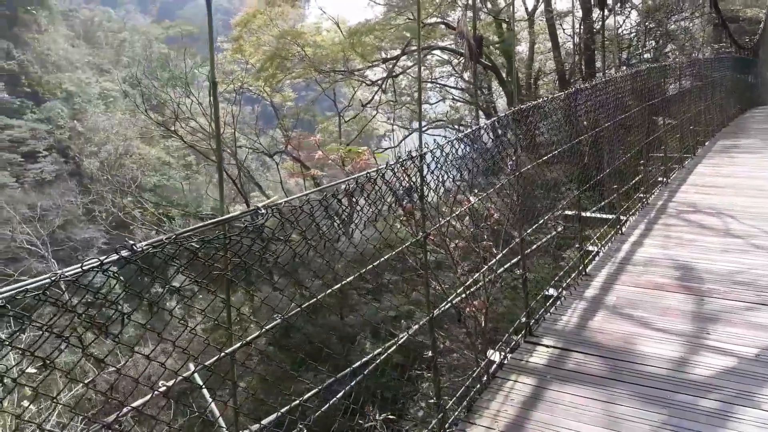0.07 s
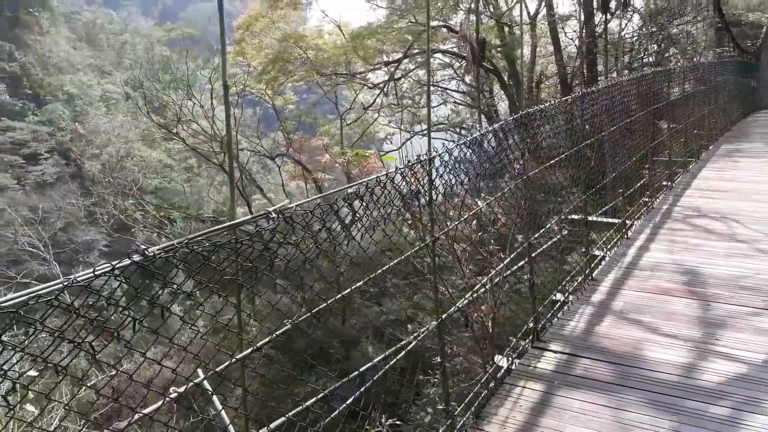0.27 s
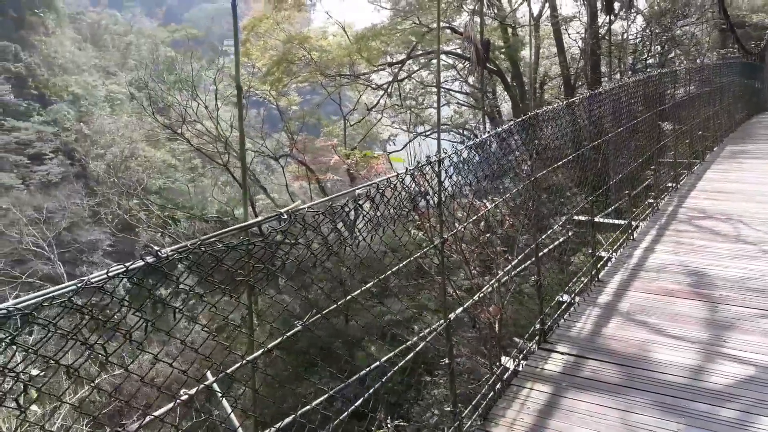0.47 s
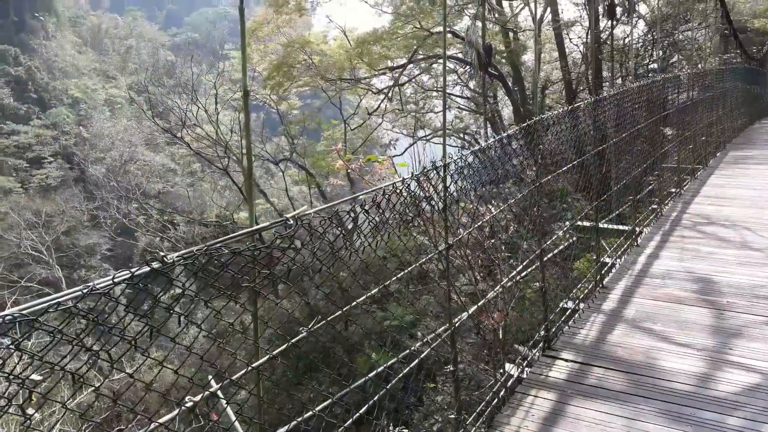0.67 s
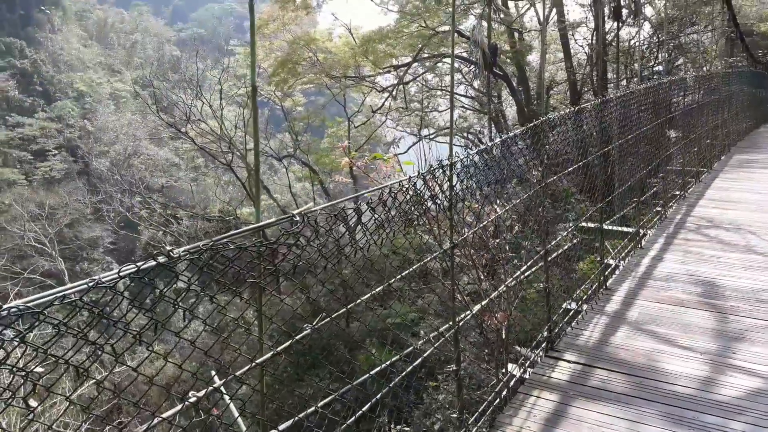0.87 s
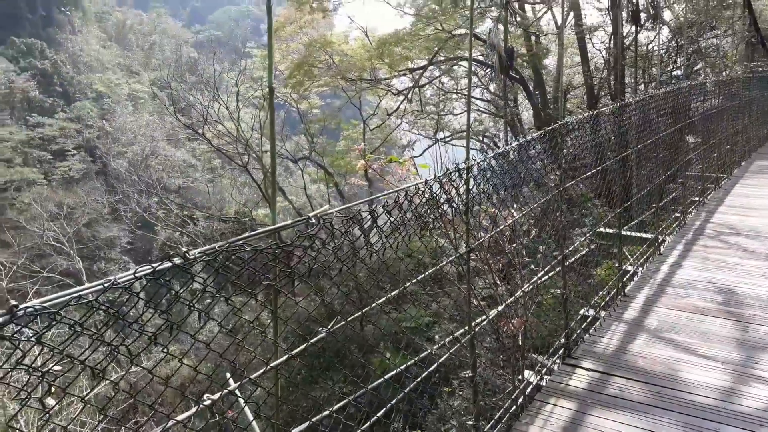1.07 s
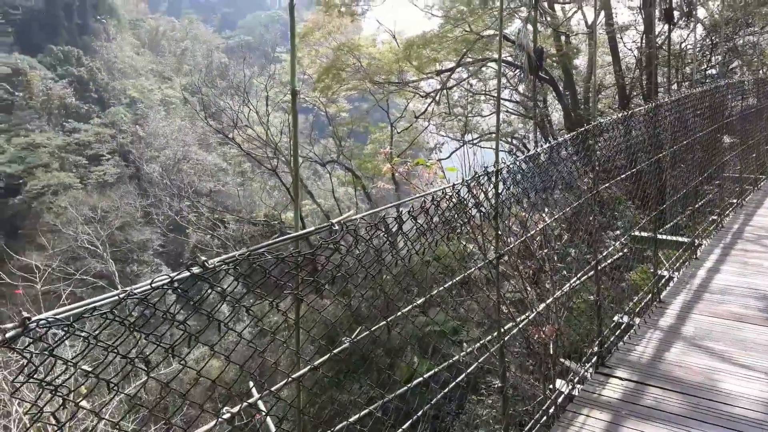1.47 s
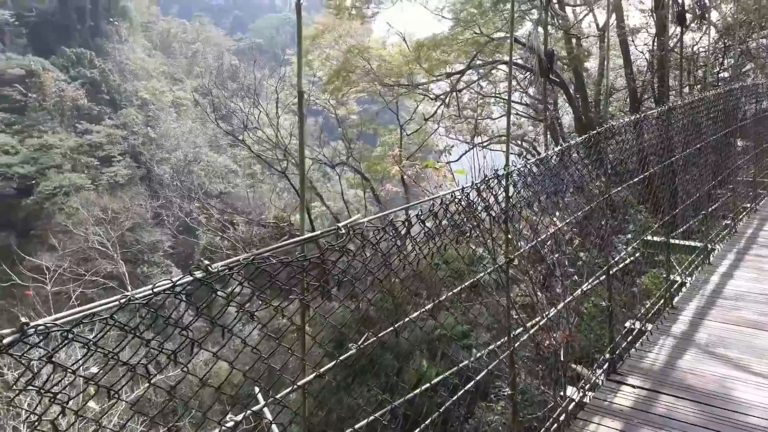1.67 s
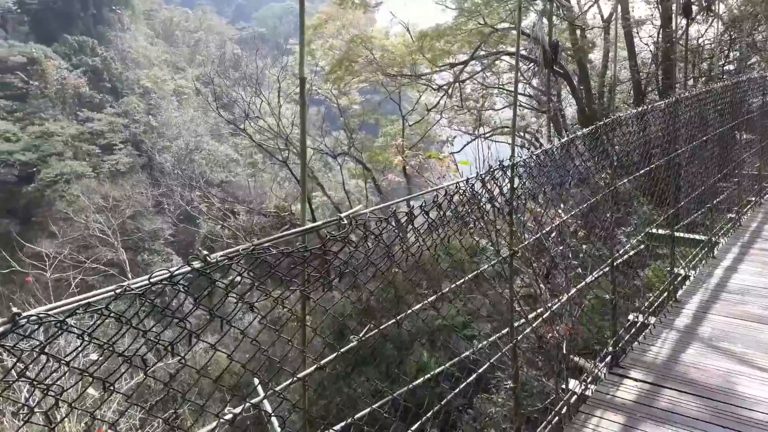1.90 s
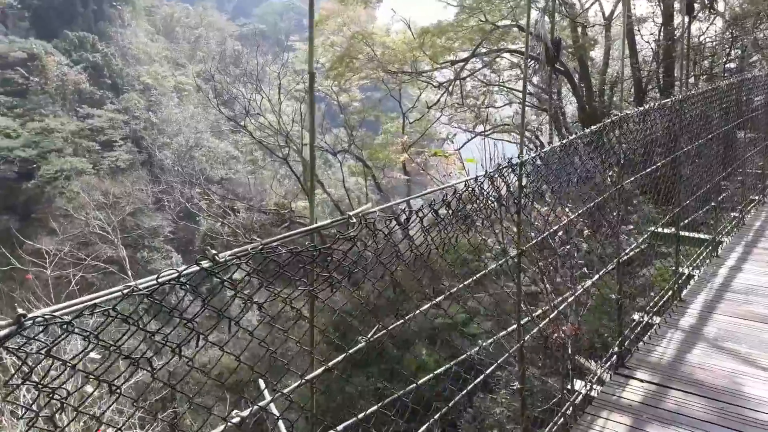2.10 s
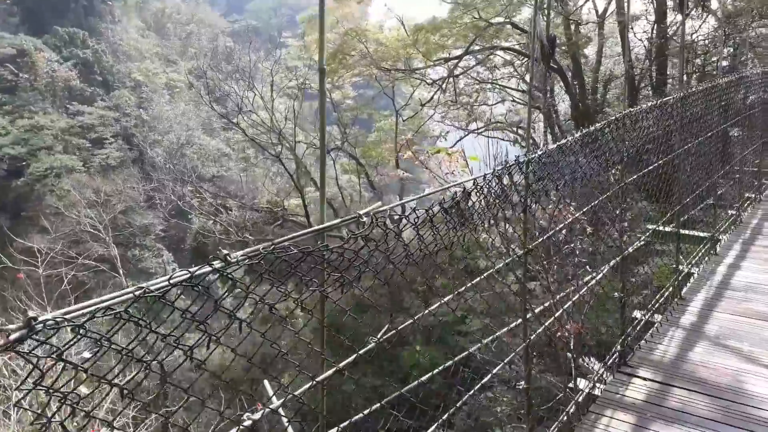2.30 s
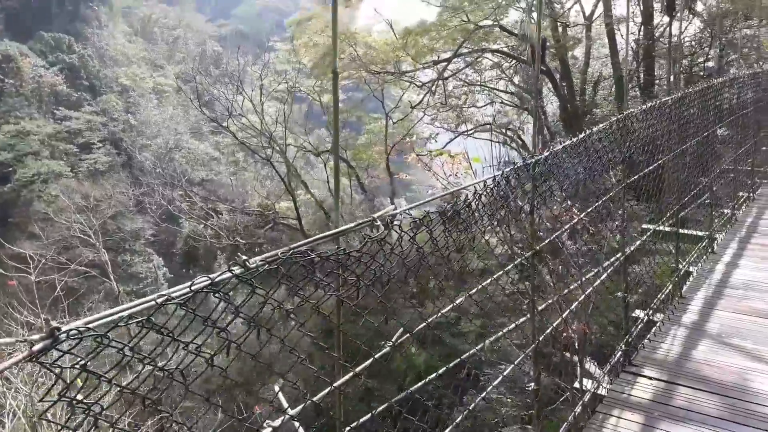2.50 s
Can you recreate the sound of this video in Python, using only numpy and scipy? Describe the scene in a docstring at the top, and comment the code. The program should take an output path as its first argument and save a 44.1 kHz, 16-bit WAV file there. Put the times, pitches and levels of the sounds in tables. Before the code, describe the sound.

A hydraulic rock breaker pounds in one rapid burst, each blow clacking on rock and ringing the steel. It stops, and the wooded gorge echoes on, with a few dull knocks over a steady airy rush.

```python
"""A wooded gorge, where a heavy hammer, probably a hydraulic rock breaker, pounds eight times a second.
Each blow clacks on rock, rings the steel and scatters through the trees; later ones hit harder
and carry less bass. The gorge rings on after the hammer stops, with a few dull knocks and tiny ticks.
Underneath lies a bed of steady, airy rush, low rumble and faint engine hum."""
import sys
import numpy as np
from scipy import signal
from scipy.fft import rfft, irfft, next_fast_len
from scipy.io import wavfile
from scipy.ndimage import uniform_filter1d, map_coordinates

SR = 44100
rng = np.random.default_rng(int(sys.argv[2]) if len(sys.argv) > 2 else 0)


def inscribe(sig):
    """Save sig as 16-bit PCM at rate SR to the path in sys.argv[1].

    A 1-D sig is mono; a 2-D sig holds one channel per row.
    Samples are clipped to [-1, 1] before scaling.
    """
    pcm = np.round(np.clip(np.atleast_2d(sig).T, -1, 1) * 32767)
    wavfile.write(sys.argv[1], SR, pcm.astype(np.int16))


N = 116865

# hammer hits and their trims
# (time [s], level [dB], bass [dB], treble [dB], boom [dB], grit [dB], ring and scatter [dB], clang [dB])
HAMMER_BLOWS = [(0.2392, -2, 1, -1, 3, 0, 2.5, 0.5), (0.3716, -2, 3.5, -1.5, -1, 0.5, 2.5, 5),
                (0.4995, -2.5, 3.5, 0.5, 4, 0, 1.5, 3), (0.626, -1, 4, 0.5, 2, 2, -0.5, 0.5),
                (0.7522, 0, 0, -2.5, 1, 1.5, 0.5, 2.5), (0.8741, -0.5, 4, 0.5, 1.5, 2, -1.5, 4.5),
                (0.9935, 0, 1.5, 2, -1.5, 1, -2, 0), (1.1120, 1.5, -1.5, 1, 1, -0.5, -2.5, -1.5),
                (1.229, 2.5, -2.5, 0, -4, 0.5, -2, -1), (1.349, 3, -1.5, 2, -9, 3.5, -0.5, -2),
                (1.475, 4.5, -3.5, -1.5, -25, 4, 0.5, 1.5), (1.5952, 5.5, -4.5, -1, -12, 4.5, -2, -1),
                (1.733, 1, -5.5, 3, -20, 0, -4.5, -13)]
# tone of steel on rock (frequency [Hz], relative density [dB])
STRIKE_SPECTRUM = [(60, -29), (100, -16.5), (135, -18.5), (175, -8.5), (280, -8.5), (380, -1.5), (520, -7),
                   (690, -1.5), (750, -8.5), (860, -5.5), (1040, -2.5), (1110, -1.5), (1220, -1.5),
                   (1290, -0.5), (1360, -10), (1440, 0), (1550, -23), (1700, -3), (2320, -4.5),
                   (2550, -8.5), (3200, -8.5), (4100, -29), (6200, -35), (7300, -43), (8400, -50),
                   (15000, -54)]
# decay of that clack (frequency [Hz], t60 [s])
STRIKE_DECAY = [(150, 0.23), (600, 0.11), (1300, 0.15), (2500, 0.11), (7000, 0.049)]
# tone of the reflections off trees and slopes (frequency [Hz], relative density [dB])
SCATTER_SPECTRUM = [(60, -37.5), (130, -14), (220, -11), (430, -1.5), (660, 0), (770, -5.5), (1220, 2.5),
                    (1560, -3.5), (1700, 1), (2300, 1), (3100, -4.5), (4500, -18.5), (6300, -26.5),
                    (7300, -19.5), (8400, -44.5), (15000, -50)]
# hollow modes of the struck mass (frequency [Hz], relative level [dB], t60 [s])
HOLLOW_MODES = [(560, -2, 0.056), (646.6, -2, 0.091), (869.4, -15.5, 0.096), (1030, -10, 0.088),
                (1198, -6.5, .18), (1287, -6, 0.097), (2277, -11.5, 0.12), (2400, -14.5, 0.21)]
# ringing modes of the tool (frequency [Hz], relative level [dB])
STEEL_MODES = [(242.2, -51), (506.0, -37), (866.7, -42), (1055, -46), (1281, -41), (1443, -39), (1672, -54),
               (2143, -37), (2272, -38)]
# thin high modes of the chisel (frequency [Hz], relative level [dB])
CHISEL_MODES = [(5351, -51), (6148, -51), (6541, -52), (8942, -58.5), (11480, -61)]
# fizz of crushed rock (frequency [Hz], relative density [dB])
GRIT_SPECTRUM = [(1500, -9), (4000, -3), (6500, 3), (7600, -1), (8300, -10), (11500, -13.5), (15500, -40)]
# dull knocks after the hammering (time [s], relative level [dB], bass [dB])
DULL_KNOCKS = [(1.963, -6.5, -1.5), (1.997, -10.5, -6), (2.053, -11, 7), (2.115, -11.5, 6),
               (2.147, -10, 1.5), (2.179, -6, 0), (2.356, -10, 5)]
# tiny high ticks (time [s], level [dB])
METAL_TICKS = [(1.929, -51), (1.963, -49), (2.458, -53)]
# tone of the gorge's reverb (frequency [Hz], relative density [dB])
GORGE_SPECTRUM = [(60, -23.5), (130, -22), (240, -1.5), (300, -6.5), (530, -2), (760, -3), (1200, 1.5),
                  (1560, 2.5), (2300, 4.5), (3100, -2.5), (4500, -18.5), (7300, -33), (8400, -51),
                  (15000, -70)]
# decay of its near tail (frequency [Hz], t60 [s])
GORGE_DECAY = [(200, 5.9), (1500, 1.7), (3000, 3.1), (8000, 3.2)]
# tone of the steady rush (frequency [Hz], relative density [dB])
RUSH_SPECTRUM = [(20, -45), (45, -28), (100, -5), (230, 0.5), (650, -0.5), (1200, -2), (1600, -1.5),
                 (2300, 4), (3200, -6.5), (4200, -12), (6200, -24), (7400, -15.5), (8300, -36.5),
                 (11500, -28.5), (15500, -32)]
# tone of the low rumble (frequency [Hz], relative density [dB])
RUMBLE_SPECTRUM = [(20, -50), (35, -26), (48, 3), (75, 1), (105, 4), (135, -11), (250, -59)]
# fader curve of the rumble (time [s], level [dB])
RUMBLE_FADER = [(0, -69), (.5, -59), (1.5, -54.5), (1.619, -52.5), (1.75, -56), (2.279, -58.5), (2.43, -50),
                (2.65, -57.5)]
# partials of the engine hum (frequency [Hz], level [dB])
HUM_PARTIALS = [(98, -65), (170, -61.5), (243, -55)]

STRIKE_DB, SCATTER_DB, HOLLOW_DB, STEEL_DB = -22, -19, -16, -25.5
CRACK_DB, RASP_DB, GRIT_DB, GORGE_DB, RUSH_DB = -40, -46.5, -49, -12.5, -42.5
STRIKE_ATTACK_S, RING_ATTACK_S, KNOCK_ATTACK_S, KNOCK_T60_S = 0.0011, 0.0072, 0.0038, 0.19
RING_SPREAD_DB, PHASE_SPREAD_RAD = 2, 0.86  # variation from hit to hit
BASS_HZ, TREBLE_HZ = 780, 1940


def hammer(repeat_share=0.54, sink_db_per_s=19):
    """Hits on one spot, so part of the clatter repeats. As the chisel sinks, its shimmer turns to rasp."""
    track, t = np.zeros(N), np.arange(SR // 2) / SR
    clatter = lambda: np.array([amp(STRIKE_DB) * strike(t), amp(SCATTER_DB) * scatter(t)])
    repeated = clatter()
    phases = rng.uniform(0, 2 * np.pi, len(STEEL_MODES))
    for s, db, bass_db, treble_db, boom_db, grit_db, ring_db, clang_db in HAMMER_BLOWS:
        direct, scattered = np.sqrt(repeat_share) * repeated + np.sqrt(1 - repeat_share) * clatter()
        exposed = amp(-sink_db_per_s * (s - HAMMER_BLOWS[0][0]))
        ring = scattered + amp(STEEL_DB) * steel(t, phases) + exposed * chisel(t)
        blow = direct + amp(CRACK_DB) * crack(t) + amp(ring_db) * ring
        body = amp(HOLLOW_DB) * hollow(t, phases, boom_db, clang_db)
        scrape = amp(RASP_DB) * (1 - exposed) * rasp(t)
        fizz = amp(GRIT_DB + grit_db) * grit(t)
        add(track, s, amp(db) * (shelves(blow, bass_db, treble_db) + body + fizz + scrape))
    return track


def strike(t, bounce_s=0.007, bounce_db=-3.5):
    """Steel on rock: a dense, tight clack with its bounce off the rough ground close behind."""
    clack = lambda: dying(rng.standard_normal(len(t)), STRIKE_DECAY)
    hit = clack()
    add(hit, bounce_s, amp(bounce_db) * clack())
    hit = even(hit, size=40) * (1 - np.exp(-t / STRIKE_ATTACK_S))
    eq_db = lambda hz: along(STRIKE_SPECTRUM, hz)
    eq_rms = np.sqrt(np.mean(amp(eq_db(np.fft.rfftfreq(len(t), 1 / SR))) ** 2))
    return coloured(hit, eq_db) / eq_rms


def scatter(t):
    """Early reflections: the blow thrown back by nearby trees and slopes."""
    return noise(SCATTER_SPECTRUM, len(t)) * envelope(t, attack_s=0.037, t60=0.43)


def hollow(t, phases, boom_db, clang_db, pitch_spread=0.015):
    """The body of the hit: low modes of the struck mass boom, higher ones clang, each slightly detuned."""
    hz, db, t60 = np.transpose(HOLLOW_MODES)[:, :, None]
    detune, shift = rng.standard_normal((2, len(hz), 1))
    start = phases[:len(hz), None] + PHASE_SPREAD_RAD * shift
    waves = np.sin(2 * np.pi * hz * (1 + pitch_spread * detune) * t + start)
    gains = amp(db + np.where(hz < BASS_HZ, boom_db, clang_db))
    return np.sum(gains * waves * envelope(t, attack_s=0.0069, t60=t60), axis=0)


def steel(t, phases, pitch_spread=0.0029):
    """The tool rings in its modes, a little different in strength and pitch on every hit."""
    hz, db = np.transpose(STEEL_MODES)
    louder, detune, shift = rng.standard_normal((3, len(hz)))
    gains = amp(db + RING_SPREAD_DB * louder) / np.linalg.norm(amp(db)) * np.sqrt(2)
    start = phases + PHASE_SPREAD_RAD * shift
    waves = np.sin(2 * np.pi * np.outer(hz * (1 + pitch_spread * detune), t) + start[:, None])
    return gains @ waves * envelope(t, RING_ATTACK_S, t60=0.26)


def chisel(t, linewidth_hz=24):
    """The chisel's thin ring above the clatter; drifting phases make it shimmer."""
    hz, db = np.transpose(CHISEL_MODES)[:, :, None]
    drift = np.cumsum(rng.standard_normal((len(hz), len(t))), axis=1)
    drift *= np.sqrt(2 * np.pi * linewidth_hz / SR)
    gains = amp(db + RING_SPREAD_DB * rng.standard_normal(db.shape))
    ring = np.sum(gains * np.sin(2 * np.pi * hz * t + drift), axis=0)
    return ring * envelope(t, RING_ATTACK_S, t60=0.44)


def crack(t, delay_s=0.0024):
    """A short, high clink of metal on metal."""
    shape = envelope(np.maximum(t - delay_s, 0), STRIKE_ATTACK_S, t60=0.048)
    return band(len(t), centre_hz=7290, width_hz=200) * shape


def rasp(t, delay_s=0.036):
    """A rasp just behind the hit, perhaps the chisel scraping in its hole."""
    shape = envelope(np.maximum(t - delay_s, 0), KNOCK_ATTACK_S, KNOCK_T60_S)
    return band(len(t), centre_hz=3970, width_hz=750) * shape


def grit(t):
    """Crushed rock: a bright burst of fizz."""
    return noise(GRIT_SPECTRUM, len(t)) * envelope(t, STRIKE_ATTACK_S, t60=0.48)


def knocks():
    """Soft, dull knocks, perhaps broken rock settling."""
    track, t = np.zeros(N), np.arange(SR // 2) / SR
    for s, db, bass_db in DULL_KNOCKS:
        knock = noise(STRIKE_SPECTRUM, len(t)) * envelope(t, KNOCK_ATTACK_S, KNOCK_T60_S)
        add(track, s, amp(STRIKE_DB + db) * shelves(knock, bass_db, treble_db=0))
    return track


def gorge(x, far_delay_s=0.533, far_db=0.5):
    """The valley's long reverb tail, with a late, smeared echo off its far side."""
    t = np.arange(N) / SR
    near = dying(rng.standard_normal(N), GORGE_DECAY) * (1 - np.exp(-t / 0.077))  # soft bloom
    far = rng.standard_normal(N) * envelope(np.maximum(t - far_delay_s, 0), attack_s=0.061, t60=2.25)
    wet = signal.fftconvolve(x, near + amp(far_db) * far)[:N]
    # tilt the clatter's tone towards that of the gorge
    wet = coloured(wet, lambda hz: along(GORGE_SPECTRUM, hz) - along(SCATTER_SPECTRUM, hz))
    return unit(wet) * np.std(x)


def ticks():
    """A few tiny metallic ticks in the tail."""
    track, t = np.zeros(N), np.arange(SR // 10) / SR
    for s, db in METAL_TICKS:
        add(track, s, amp(db) * crack(t))
    return track


def engine(waver_hz=9.12):
    """A faint, wavering hum, probably the engine that drives the hammer."""
    turn = 2 * np.pi * np.arange(N) / SR
    return sum(amp(db) * (wobble(waver_hz) * np.sin(hz * turn) + wobble(waver_hz) * np.cos(hz * turn))
               for hz, db in HUM_PARTIALS)


def background_rush():
    """The bed: a steady, airy rush hanging in the gorge, over a low rumble that swells and ebbs."""
    fader_db = np.interp(np.arange(N) / SR, *np.transpose(RUMBLE_FADER))
    rumble = amp(fader_db) * noise(RUMBLE_SPECTRUM, N)
    return amp(RUSH_DB) * noise(RUSH_SPECTRUM, N) + rumble


def amp(db):
    """Decibels to gain."""
    return 10 ** (np.asarray(db) / 20)


def unit(x):
    """x at rms 1."""
    return x / np.sqrt(np.mean(x ** 2) + 1e-20)


def along(points, hz):
    """(Hz, value) points read on a log axis."""
    f, v = np.transpose(points)
    return np.interp(np.log(hz + 1), np.log(f + 1), v)


def add(track, s, sound):
    """Mix a sound into the track at s seconds."""
    part = track[int(s * SR):][:len(sound)]
    part += sound[:len(part)]


def coloured(x, db_of_hz):
    """x through a causal filter with the given dB response."""
    m = 2 * next_fast_len(len(x), real=True)
    cepstrum = irfft(np.log(amp(db_of_hz(np.fft.rfftfreq(m, 1 / SR))) + 1e-7))
    cepstrum[1:m // 2] *= 2
    cepstrum[m // 2 + 1:] = 0
    return irfft(rfft(x, m) * np.exp(rfft(cepstrum)))[:len(x)]


def shelves(x, bass_db, treble_db):
    """Low and high shelving EQ."""
    below = lambda hz, corner: 1 / (1 + (hz / corner) ** 4)
    return coloured(x, lambda hz: bass_db * below(hz, BASS_HZ) + treble_db * (1 - below(hz, TREBLE_HZ)))


def noise(spectrum, size):
    """Noise of rms 1 with the given spectrum."""
    gains = amp(along(spectrum, np.fft.rfftfreq(size, 1 / SR)))
    return unit(irfft(rfft(rng.standard_normal(size)) * gains, size))


def band(size, centre_hz, width_hz):
    """Band-passed noise at rms 1."""
    eq_db = lambda hz: -10 * np.log10(1 + ((hz - centre_hz) / width_hz) ** 4)
    return unit(coloured(rng.standard_normal(size), eq_db))


def dying(x, t60):
    """x with each frequency fading at its own speed."""
    hz, t, z = signal.stft(x, SR, nperseg=256)
    return signal.istft(z * amp(-60 * t / along(t60, hz)[:, None]), SR)[1][:len(x)]


def envelope(t, attack_s, t60):
    """Rise and exponential fall."""
    return (1 - np.exp(-t / attack_s)) * np.exp(-np.log(1000) * t / t60)


def even(x, size):
    """x with the chance humps of its spectrum levelled, keeping its broad shape, faded out at the end."""
    z = rfft(x, 2 * len(x))
    power = lambda width: np.abs(uniform_filter1d(np.abs(z) ** 2, width)) + 1e-12
    fade = 1 - np.linspace(0, 1, len(x)) ** 2
    return irfft(z * np.sqrt(power(size * 10) / power(size)))[:len(x)] * fade


def wobble(rate_hz):
    """A smooth random LFO."""
    return map_coordinates(rng.standard_normal(200), [np.arange(N) / SR * rate_hz], mode="mirror")


def scene():
    """Mono mix: hammer and knocks feed the gorge's reverb; ticks, engine and rush stay dry."""
    impacts = hammer() + knocks()
    return (impacts + amp(GORGE_DB) * gorge(impacts) + ticks() + engine() + background_rush())[None]


def record(dry):
    """Master EQ: roll off the sub-bass and cut the very top."""
    low_cut_hz, top_hz = 39, 15800
    size = next_fast_len(N + SR // 2)
    hz = np.fft.rfftfreq(size, 1 / SR)
    low_cut = 1 - 1 / (1 + (hz / low_cut_hz) ** 6)
    return irfft(rfft(dry, size) * low_cut * (hz < top_hz), size)[:, :N]


dry = scene()
out = record(dry)
inscribe(out)
```